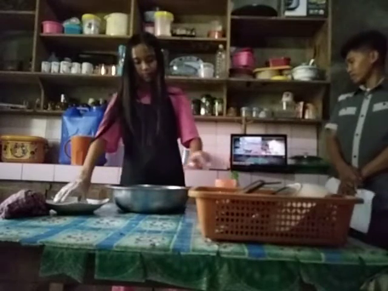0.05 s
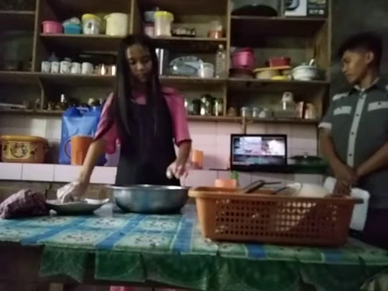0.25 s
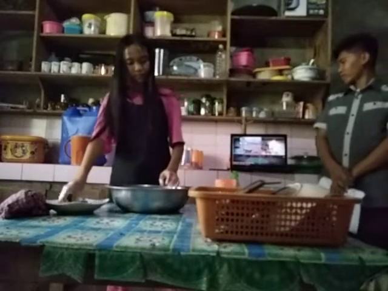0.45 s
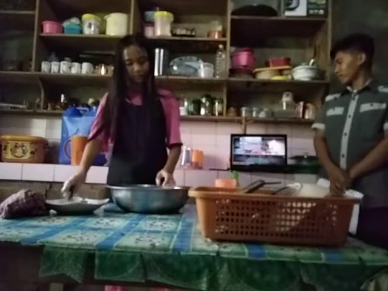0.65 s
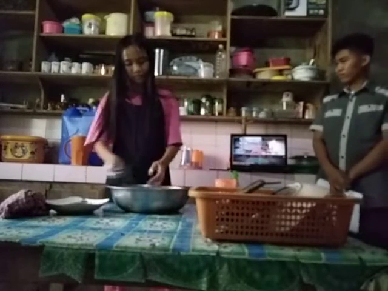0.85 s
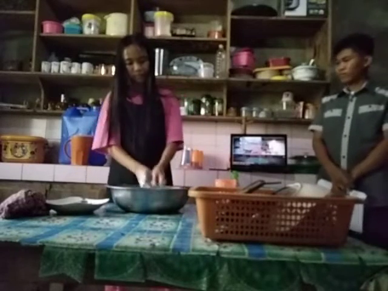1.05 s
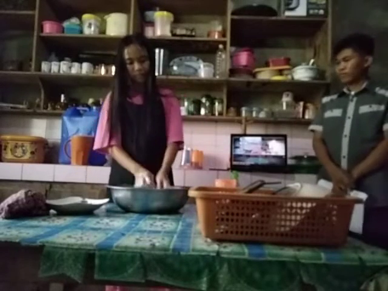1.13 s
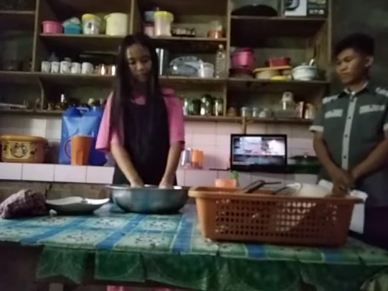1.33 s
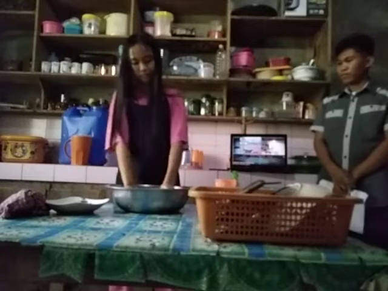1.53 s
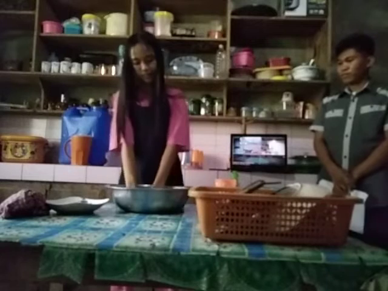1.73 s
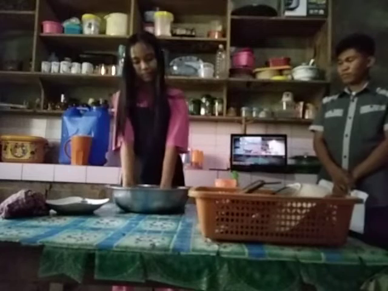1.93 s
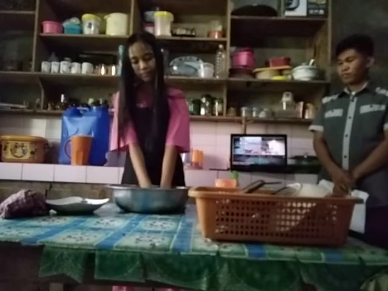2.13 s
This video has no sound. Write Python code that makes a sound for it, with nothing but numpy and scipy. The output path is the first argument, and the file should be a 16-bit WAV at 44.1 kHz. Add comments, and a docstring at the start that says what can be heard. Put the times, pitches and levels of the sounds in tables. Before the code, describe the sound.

A steel dish clatters, then knocks and brief scrubbing in a washing-up basin.

```python
"""Washing up in a hard-walled kitchen, heard from across the table.
First a steel dish is picked up, and each contact excites its modes. Near 1.1 s a utensil clinks.
Near 1.4 s water swishes and gurgles; then things knock in the steel basin and are scrubbed.
Throughout, small drips ring as bubbles and the room reverberates after every contact.
A motor hums underneath, with a faint, wavering tone that is strongest in the first half second."""
import sys
import numpy as np
from scipy import signal
from scipy.fft import rfft, irfft, next_fast_len
from scipy.io import wavfile
from scipy.ndimage import map_coordinates

SR = 44100
rng = np.random.default_rng(int(sys.argv[2]) if len(sys.argv) > 2 else 0)


def put_to_file(sound):
    """Save the sound as 16-bit audio at rate SR, in the file named by the first command-line argument."""
    columns = np.atleast_2d(sound).T  # one column per channel
    safe = np.clip(columns, -1, 1)
    whole_steps = np.round(safe * 32767)
    wavfile.write(sys.argv[1], SR, whole_steps.astype(np.int16))


N = 97020


def dish():
    """Impact excitation: a run of contacts sets the steel dish's inharmonic modes ringing."""
    # contacts: start_s, level_db, ring_over_clash_db, tilt_db_per_octave, low_cut_hz
    contacts = [(.207, -45, -12.5, -7, 2580), (.2145, -36, -27, -1.5, 2060), (.2325, -32, -11, 0.5, 686),
                (.245, -34, -10, -3, 480), (.288, -47.5, -1, -5, 500), (.306, -37.5, -7, -0.5, 500),
                (.3195, -24, -2.5, 0.5, 500), (.330, -35.5, -7.5, -2, 200), (.351, -34.5, -13, -2, 100),
                (.377, -38, -14.5, -0.5, 100), (.441, -37, -7.5, -2, 820), (.451, -56.5, -21, -5, 810),
                (.466, -42, -9.5, -1.5, 810), (.498, -44.5, -4, -1.5, 790), (.545, -48.5, -5.5, -4, 590),
                (.568, -45, -10, 1, 590)]
    # lasting modes: pitch_hz, relative_db, t60_s
    modes = [(794, -14, .15), (1109, -7, .22), (1190, -10, .25), (1396, -9, .15), (2827, -12, .2),
             (3232, -4, .18), (3305, -6, .2), (3828, -7, .22), (4409, -2, .22), (5363, -10, .2),
             (5631, -9, .18), (6140, -1, .15), (7348, 0, .14), (8240, -11, .15), (11580, -9, .14)]
    # spectrum of the dense, short-lived modes: frequency_hz, relative_db
    clash = [(120, -32), (330, -13.5), (480, -20), (700, -11), (1150, -5), (1650, -8.5), (2500, -5),
             (3200, 1.5), (5200, -1), (8000, -2.5), (9700, -12), (15500, -21)]
    return steel_contacts(contacts, modes, clash, clash_t60_s=.024)


def utensil():
    """Free vibration: a small, stiff utensil clinks in high modes after each contact."""
    # contacts: start_s, level_db, ring_over_clash_db, tilt_db_per_octave, low_cut_hz
    contacts = [(1.0855, -47, 4, 7.5, 2450), (1.092, -39.5, -5, 0, 2050), (1.101, -39, -6, -0.5, 2000)]
    # lasting modes: pitch_hz, relative_db, t60_s
    modes = [(3106, -6, 0.093), (3130, -13, 0.2), (4870, -15, 0.18), (5087, -9, 0.11), (5220, 6, 0.1),
             (5696, 5, 0.12), (5070, 10.5, 0.07), (7060, 0, 0.091), (7240, -39, 0.17), (7424, 0, 0.084),
             (9100, -6.5, 0.12), (11000, -23, 0.085), (12100, -19, 0.14), (15200, -13.5, 0.093)]
    # spectrum of the dense, short-lived modes: frequency_hz, relative_db
    clash = [(1200, -53), (2200, -24), (3200, -7), (3900, -11), (5200, 3.5), (6300, -3), (7300, 0.5),
             (10200, -18), (11700, -5), (13200, -19), (15500, -11)]
    return steel_contacts(contacts, modes, clash, clash_t60_s=.03)


def steel_contacts(contacts, modes, clash, clash_t60_s):
    """Superposition: each contact on steel sums a brief, bright clash and a longer ring."""
    out = np.zeros(N)
    for start_s, level_db, ring_db, tilt_db, low_cut_hz in contacts:
        def clash_db(hz):
            brightness_db = tilt_db * np.log2((hz + 1) / (SR / 10))
            low_cut_db = 10 * np.log10(1 + (low_cut_hz / (hz + 1)) ** 6)
            return along(clash, hz) + brightness_db - low_cut_db
        contact = burst(clash_t60_s, clash_db) + amp(ring_db) * ring(modes, tilt_db)
        add(out, start_s, amp(level_db) * contact)
    return out


def basin():
    """Damped plate vibration: a knock gives a click, a ringing thud and a rattle of the basin wall."""
    # knocks: start_s, click_db, thud_db, thud_centre_hz, wall_db
    knocks = [(1.414, -57.5, -60, 260, -79), (1.437, -62.5, -69, 650, -93),
              (1.7537, -41.5, -46, 457, -50.5), (2.0231, -41.5, -50.5, 756, -48)]
    # spectra of the click and of the wall's rattle: frequency_hz, relative_db
    click_spectrum = [(1500, -37), (3000, -10), (4400, -1.5), (5700, 1), (8000, -4), (9500, -15),
                      (15500, -32.5)]
    wall_spectrum = [(600, -37.5), (1130, 1.5), (1550, -9.5), (2300, 1.5), (3200, -7), (5000, -28)]
    # low modes of the basin: pitch_hz, relative_db, t60_s
    modes = [(365, -8.5, 0.17), (555.6, 1, 0.14), (665, 4, 0.095), (747, -3, 0.17)]
    out = np.zeros(N)
    for start_s, click_db, thud_db, thud_hz, wall_db in knocks:
        click = burst(t60_s=.011, shape_db=lambda hz: along(click_spectrum, hz))
        thud = burst(t60_s=.046, shape_db=lambda hz: hump(hz, thud_hz, octaves=.52))
        thud += amp(-6) * ring(modes)
        wall = burst(t60_s=.045, shape_db=lambda hz: along(wall_spectrum, hz))
        add(out, start_s, amp(click_db) * click + amp(thud_db) * thud + amp(wall_db) * wall)
    return out


def burst(t60_s, shape_db):
    """Modal overlap: many close, quickly damped modes merge into a burst of noise."""
    t = np.arange(SR) / SR
    spectrum = rfft(rng.standard_normal(SR) * amp(-60 * t / t60_s))
    flattened = irfft(spectrum / (np.abs(spectrum) + 1e-12), SR)
    return heard(colour(flattened * np.exp(-t / t60_s), shape_db))


def ring(modes, tilt_db=0):
    """Modal decay: a struck body rings as damped sinusoids, slightly different at each blow."""
    t = np.arange(SR) / SR
    detune, onset_s = .003, .00079
    tones = np.zeros(SR)
    for hz, db, t60_s in modes:
        envelope = amp(db + tilt_db * np.log2(hz) + rng.normal(0, 2) - 60 * t / t60_s)
        pitch_hz = hz * (1 + rng.normal(0, detune))
        tones += envelope * np.sin(2 * np.pi * (pitch_hz * t + rng.random()))
    return heard(tones * (1 - np.exp(-t / onset_s)))


def swish_and_scrub():
    """Modulated noise: a hand swishes in water, then grainy scrubbing strokes swell and fade."""
    # the swish, then the scrubs: start_s, swell_s, fade_s, level_db
    strokes = [(1.388, 0.022, 0.084, -49), (1.873, 0.023, 0.065, -47), (1.924, 0.053, .055, -43.5),
               (2.15, 0.012, 0.014, -46.5)]
    # spectrum of every stroke: frequency_hz, relative_db
    spectrum = [(1800, -33), (3500, -19), (4400, -0.5), (4950, -7.5), (5700, 3), (6600, -4), (7800, 1),
                (9500, -10.5), (15500, -26)]
    t = np.arange(N) / SR
    envelope = sum(amp(db) * np.interp(t, [start, start + swell, start + swell + fade], [0, 1, 0])
                   for start, swell, fade, db in strokes)
    grains = rng.standard_normal(N) * amp(4.5 * wobble(250))
    return kitchen(envelope * unit(colour(grains, lambda hz: along(spectrum, hz))))


def bubbles_and_drips():
    """Bubble resonance: a brief low gurgle and small high drips ring and rise slightly in pitch."""
    # bubbles: start_s, pitch_hz, level_db
    bubbles = [(.04, 2730, -81), (0.949, 2370, -78), (0.989, 5260, -79), (1.03, 4300, -75.5),
               (1.395, 377, -69), (1.41, 4300, -64.5), (1.425, 553, -67), (1.44, 790, -64.5),
               (1.465, 3420, -71), (1.51, 1730, -78), (1.883, 3330, -67.5), (1.98, 2910, -69)]
    t60_s, rise_per_s = .023, 1.5
    out, t = np.zeros(N), np.arange(SR // 2) / SR
    for start_s, pitch_hz, level_db in bubbles:
        bubble = np.sin(2 * np.pi * pitch_hz * (t + rise_per_s * t ** 2 / 2)) * amp(-60 * t / t60_s)
        add(out, start_s, amp(level_db) * heard(bubble))
    return out


def kitchen(x):
    """Reverberation: direct sound plus a diffuse tail that builds and decays, new for each position."""
    # reverberation time: frequency_hz, t60_s
    decay = [(150, .4), (1000, 0.37), (4000, 0.28), (8000, 0.31), (15000, 0.23)]
    tail_s, build_s, direct_db = .7, .011, -6.5
    t = np.arange(int(tail_s * SR)) / SR
    hz, frame_s, spectra = signal.stft(rng.standard_normal(len(t)), SR, nperseg=256)
    spectra *= amp(-60 * frame_s / along(decay, hz)[:, None])
    tail = signal.istft(spectra, SR, nperseg=256)[1][:len(t)]
    tail *= 1 - np.exp(-t / build_s)
    tail /= np.linalg.norm(tail)
    return amp(direct_db) * x + signal.fftconvolve(x, tail)[:len(x)]


def heard(x):
    """A contact with its reverberation, scaled to the energy of 50 ms at 0 dB."""
    wet = kitchen(x)
    return wet / np.linalg.norm(wet) * np.sqrt(SR / 20)


def motor():
    """Periodic vibration: a motor hums in a harmonic series that wavers in pitch and level."""
    # envelope of the hum: time_s, fundamental_db, overtones_db
    envelope = [(0, -63.5, -68), (.13, -60, -77), (.39, -60.5, -67.5), (.75, -62, -75.5),
                (1.03, -71.5, -85), (1.13, -61.5, -69.5), (1.54, -63.5, -64.5), (1.8, -60, -68.5),
                (2.2, -63, -72)]
    # overtones: harmonic_number, relative_db
    harmonics = [(2, 0), (3, -12), (4, -17)]
    fundamental_db, overtones_db = curves(envelope)
    pitch_hz = 74.3 + 1.5 * wobble(12)
    phase = 2 * np.pi * np.cumsum(pitch_hz) / SR
    overtones = sum(amp(db + 1.5 * wobble(10)) * np.sin(round(k) * phase + 2 * np.pi * rng.random())
                    for k, db in harmonics)
    fundamental = amp(fundamental_db + 1.2 * wobble(12)) * np.sin(phase)
    return np.sqrt(2) * (fundamental + amp(overtones_db) * overtones)


def faint_low_note():
    """Frequency modulation: a soft tone wavers near 354 Hz in the background."""
    # envelope of the tone: time_s, level_db
    envelope = [(0, -63), (.1, -77.5), (.2, -65), (.36, -60), (.47, -58), (.58, -84.5), (.8, -83.5)]
    level_db, = curves(envelope)
    pitch_hz = 354.3 + 6.4 * wobble(25)
    return amp(level_db) * unit(np.sin(2 * np.pi * np.cumsum(pitch_hz) / SR))


def room_air():
    """Ambient noise: a steady, bass-heavy floor and two faint, narrow bands that come and go."""
    # spectrum of the air: frequency_hz, relative_db
    spectrum = [(20, -4), (35, -4.5), (50, -0.5), (115, 1.5), (190, -11.5), (330, -19), (600, -21),
                (850, -25), (2000, -27), (4000, -34), (8000, -37), (10000, -45), (15500, -53)]
    # envelopes of the two bands: time_s, level_db
    low_band = [(0, -66.5), (.15, -80), (.68, -73), (.85, -98), (.96, -68.5), (1.12, -90), (1.27, -69.5),
                (1.55, -82), (1.68, -73.5), (2.2, -73)]
    high_band = [(0, -84.5), (.7, -73), (.9, -96), (1.02, -75.5), (1.35, -84), (1.56, -82), (1.63, -74.5),
                 (1.72, -82.5), (2.2, -70)]
    air = amp(-67) * unit(colour(rng.standard_normal(N), lambda hz: along(spectrum, hz)))
    for envelope, centre_hz, octaves in (low_band, 521.5, .11), (high_band, 1034, .04):
        band = unit(colour(rng.standard_normal(N), lambda hz: hump(hz, centre_hz, octaves)))
        air += amp(curves(envelope)[0]) * band
    return air


def amp(db):
    """Decibels as an amplitude ratio."""
    return 10 ** (np.asarray(db) / 20)


def unit(x):
    """x scaled to an RMS of one."""
    return x / np.sqrt(np.mean(x ** 2) + 1e-20)


def along(points, hz):
    """Interpolation of (frequency_hz, value) points on a log frequency axis."""
    frequencies, values = np.transpose(points)
    return np.interp(np.log(hz + 1), np.log(frequencies + 1), values)


def hump(hz, centre_hz, octaves):
    """A Gaussian band on a log frequency axis, in dB."""
    return -10 / np.log(10) * (np.log2((hz + 1) / centre_hz) / octaves) ** 2 / 2


def curves(rows):
    """Linear interpolation, one value per sample, of each column after the time."""
    time_s, *columns = np.transpose(rows)
    return [np.interp(np.arange(N) / SR, time_s, column) for column in columns]


def wobble(knots_per_s):
    """Random modulation: a smooth curve through Gaussian knots."""
    knots = rng.standard_normal(int(N * knots_per_s / SR) + 4)
    return map_coordinates(knots, [np.arange(N) * knots_per_s / SR])


def colour(x, shape_db):
    """Minimum-phase filtering of x, with a gain in dB given as a function of frequency."""
    size = 2 * next_fast_len(len(x) // 2 + SR // 8)
    gain = np.maximum(amp(shape_db(np.fft.rfftfreq(size, 1 / SR))), 1e-6)
    cepstrum = irfft(np.log(gain))
    cepstrum[1:size // 2] *= 2  # folding the cepstrum makes the filter causal
    cepstrum[size // 2 + 1:] = 0
    return irfft(rfft(x, size) * np.exp(rfft(cepstrum)), size)[:len(x)]


def add(track, start_s, x):
    """Mix x into the track from start_s."""
    part = track[round(start_s * SR):][:len(x)]
    part += x[:len(part)]


def scene():
    """Superposition: the pressures of all sources add in one channel."""
    return (dish() + faint_low_note() + utensil() + basin() + swish_and_scrub()
            + bubbles_and_drips() + motor() + room_air())[None]


def record(dry):
    """Band limiting: a steep elliptic low-pass removes the highest treble."""
    top_hz = 15550
    return signal.sosfilt(signal.ellip(12, .1, 80, top_hz, fs=SR, output="sos"), dry)


dry = scene()
out = record(dry)
put_to_file(out)
```